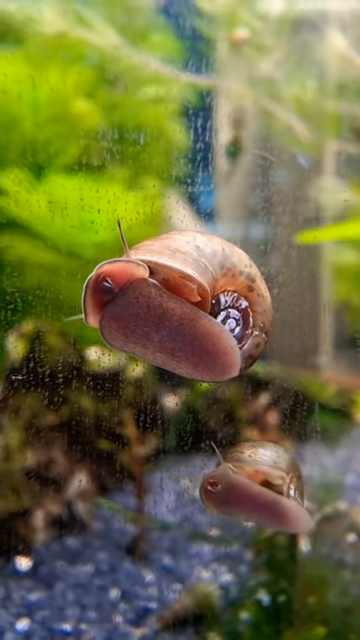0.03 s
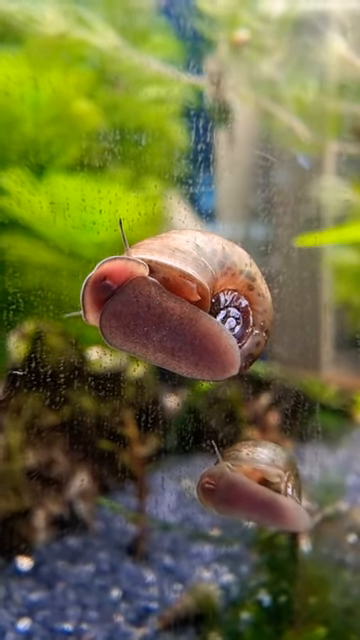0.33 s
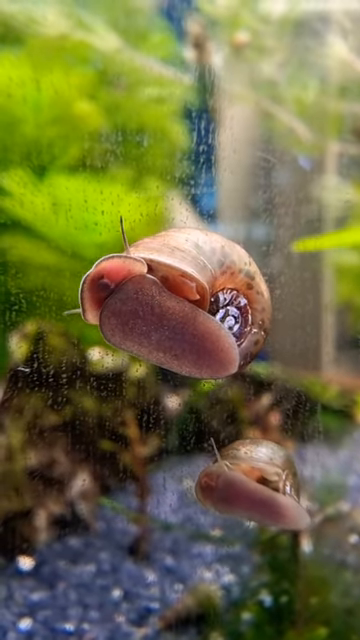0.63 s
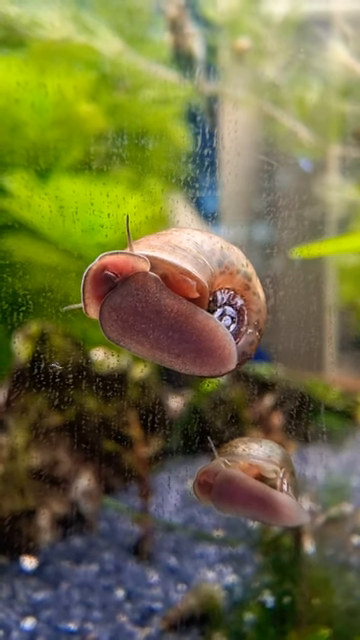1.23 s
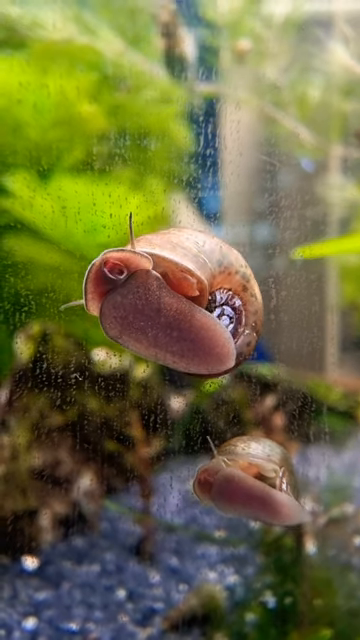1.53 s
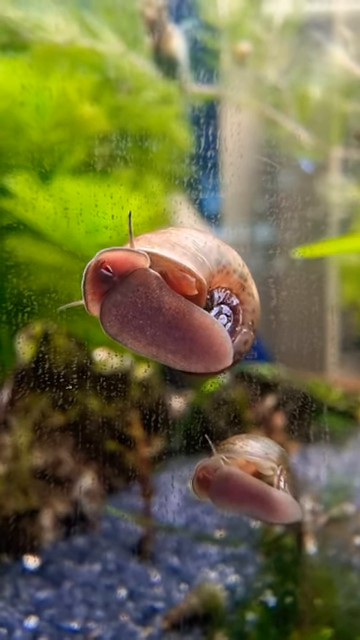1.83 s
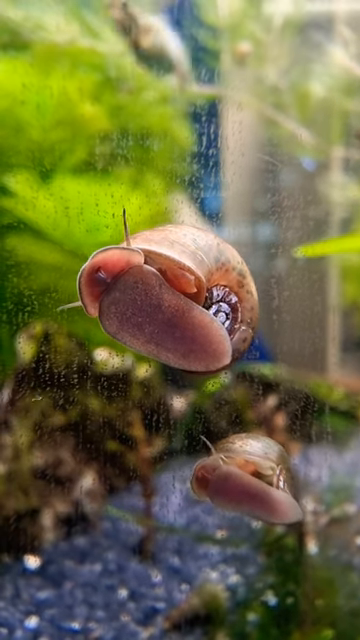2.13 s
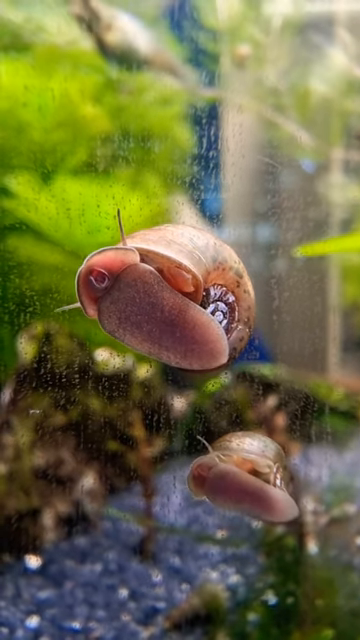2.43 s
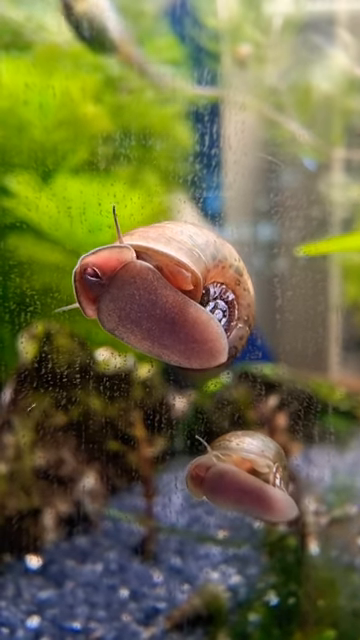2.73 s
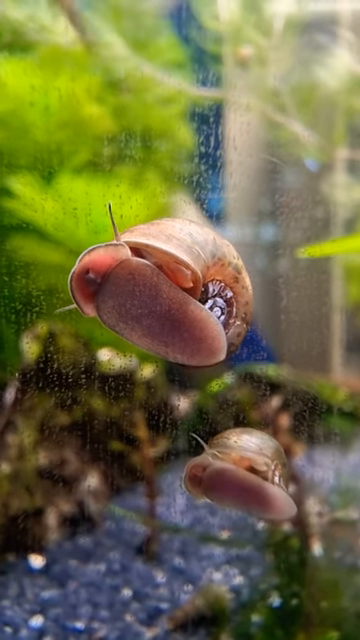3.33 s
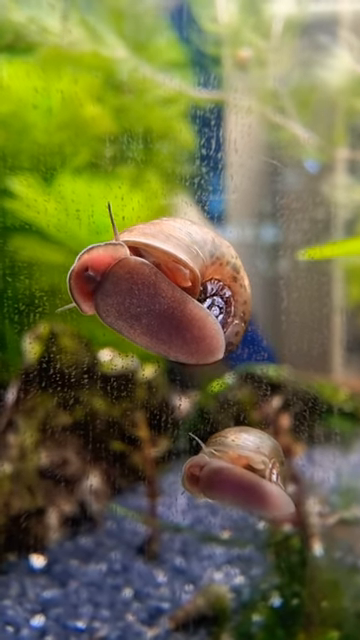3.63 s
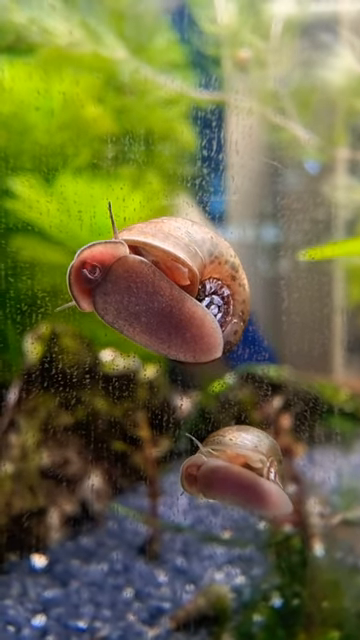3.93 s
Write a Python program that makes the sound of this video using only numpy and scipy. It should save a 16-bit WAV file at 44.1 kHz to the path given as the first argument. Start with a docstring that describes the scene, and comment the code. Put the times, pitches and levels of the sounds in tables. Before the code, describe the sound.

An aquarium pump hums low and steady, heard close to the glass in a quiet room, over a soft rush of water and air. Near the end come two faint dull bumps and a soft knock.

```python
"""A low, steady mains hum from an aquarium pump, heard close to the glass in a quiet room.
A motor adds slowly wandering tones of its own, over a soft rush of circulating water and air.
A few faint hisses pass in the first half. Near the end come two dull bumps, the first very faint,
and then a soft ringing knock."""
import sys
import numpy as np
from scipy import signal
from scipy.fft import rfft, irfft
from scipy.io import wavfile

SR = 44100
rng = np.random.default_rng(int(sys.argv[2]) if len(sys.argv) > 2 else 0)


def store_wav(level_fs):
    """Save 16-bit WAV to argv[1]."""
    pcm = np.round(np.clip(np.atleast_2d(level_fs), -1, 1) * 32767)
    wavfile.write(sys.argv[1], SR, pcm.T.astype(np.int16))


N = 176400

# pump hum: multiple of the mains, left level/dB, right level/dB
PUMP_HARMONICS = [(2, -46.5, -46.5), (4, -84.5, -71), (5, -67, -62), (6, -71, -62.5), (7, -85.5, -74.5),
                  (8, -88, -69.5), (10, -84.5, -80.5), (14, -83.5, -81.5), (18, -90.5, -86)]
# motor tones, off the mains series: f/Hz, left level/dB, right level/dB
MOTOR_TONES = [(42.3, -76, -75), (49.4, -65, -64), (70.9, -73, -72), (142.6, -66, -66), (190.3, -69, -67),
               (206.2, -77, -74), (412.5, -78, -74), (587.5, -82, -79), (618.8, -84, -76), (1380, -94, -89)]
# bed of water and air: f/Hz, left density/dB per Hz, right density/dB per Hz
RUSH_SPECTRUM = [(19.7, -99, -98.5), (31, -87, -85.5), (47, -78.5, -77.5), (81.7, -74.5, -76.5),
                 (115, -84, -78.5), (174, -89.5, -86.5), (264, -93.5, -80), (373, -90, -89),
                 (481, -93.5, -94), (683, -98, -90), (1033, -93.5, -91.5), (1430, -99, -99),
                 (1573, -105, -103), (2200, -109, -109), (3015, -113, -110), (3300, -119, -120),
                 (4650, -131, -129), (6400, -130, -123), (7360, -123, -120), (8340, -137, -137),
                 (10700, -137, -137), (12800, -135, -132), (15500, -135, -132)]
# resonances that colour the bed: f/Hz, width/Hz, lift/dB
RUSH_RESONANCES = [(301.5, 14, 8.5), (441.2, 12, 7.5), (587.7, 65, 10), (735, 16, 3.5), (1382, 40, 6.5),
                   (1792, 28, 6.5), (2884, 91, 2), (3920, 570, 2), (5260, 220, 1.5), (7300, 150, 4)]
# stereo image: f/Hz, likeness of the two sides (0-1), left lead/rad
STEREO_IMAGE = [(49, .94, 0.13), (145, 0.7, 0.083), (249, 0.5, 0.41), (343, 0.2, 0.24), (524, 0, 0.41),
                (617, 1, 1.98), (820, 0.62, 2.58), (1200, 0.82, 2.96), (1820, 0.54, 2.2), (2300, 0.02, 2.3),
                (8000, 0.2, 3.4)]
# faint hisses: centre t/s, half length/s, density/dB per Hz, lower edge/Hz, upper edge/Hz
HISS_SWELLS = [(.868, .038, -114, 6200, 7200), (1.665, .024, -128, 12500, 15500),
               (1.92, .045, -107, 2700, 3000), (1.948, .035, -119.5, 3500, 7000)]
# contacts behind the dull bumps: t/s, drive level/dB
BUMP_HITS = [(2.990, -46), (3.769, -35.5)]
# modes of the bumped body: f/Hz, gain/dB, t60/s, leftward pan/dB
BUMP_BODY = [(304, -2, .012, -12), (850, -9, 0.0065, 7.5), (1870, -17.5, 0.0071, -0.5)]
# ring of the knock: f/Hz, relative level/dB, blur width/Hz
KNOCK_RING = [(388, -7, 20), (620, -8, 60), (883, 0, 7), (1020, -10, 60), (1300, -8, 50)]


def from_db(db):
    """Decibels to gain."""
    return 10 ** (np.asarray(db) / 20)


def at_hz(rows, hz):
    """Each column of a table, read on a log-frequency axis."""
    knots, *columns = np.transpose(rows)
    return [np.interp(np.log(hz + 1e-9), np.log(knots), column) for column in columns]


def panned(db):
    """Left and right gains; positive dB leans left."""
    return from_db([[db / 2], [-db / 2]])


def drift(rate_hz):
    """Smooth random modulation with spread 1, rolled off above rate_hz."""
    hop, settle = 40, 2000
    pole = np.exp(-2 * np.pi * rate_hz * hop / SR)
    noise = rng.standard_normal(N // hop + settle + 2)
    slow = signal.lfilter([1], [1, -2 * pole, pole * pole], noise)[settle:]
    return np.interp(np.arange(N) / hop, np.arange(len(slow)), slow / slow.std())


def tone(hz, swing, lead=None):
    """A stereo sine of rms 1, then modulated in level and phase by swing; lead/rad puts the left ahead."""
    lead = at_hz(STEREO_IMAGE, hz)[1] if lead is None else lead
    wave = swing * np.exp(2j * np.pi * (hz * np.arange(N) / SR + rng.random()))
    return np.sqrt(2) * np.real([wave * np.exp(1j * lead), wave])


def stereo_noise(density_db):
    """Noise of a given spectrum, partly shared between left and right."""
    alike, lead = at_hz(STEREO_IMAGE, np.fft.rfftfreq(N, 1 / SR))
    right, own = rfft(rng.standard_normal((2, N)))
    left = alike * np.exp(1j * lead) * right + np.sqrt(1 - alike ** 2) * own
    return irfft(np.array([left, right]) * from_db(density_db), N) * np.sqrt(SR / 2)


def pump_hum(mains_hz=50.02, waver_db=0.82, waver_hz=2.5):
    """The pump hums in gently wavering harmonics of the mains, the second far above the rest."""
    out = 0
    for multiple, left_db, right_db in PUMP_HARMONICS:
        swing = from_db(waver_db * drift(waver_hz))
        out += from_db([[left_db], [right_db]]) * tone(multiple * mains_hz, swing)
    return out


def motor_drone(waver_depth=0.22, waver_hz=1.8):
    """The motor's weaker tones wander in strength and phase."""
    out = 0
    for hz, left_db, right_db in MOTOR_TONES:
        swing = 1 + waver_depth * (drift(waver_hz) + 1j * drift(waver_hz))
        out += from_db([[left_db], [right_db]]) * tone(hz, swing)
    return out


def water_rush():
    """Circulating water and air lay down an even bed of noise, lifted at a few resonances."""
    f = np.fft.rfftfreq(N, 1 / SR)
    lift_db = sum(db / (1 + (2 * (f - hz) / width) ** 2) for hz, width, db in RUSH_RESONANCES)
    return stereo_noise(np.array(at_hz(RUSH_SPECTRUM, f)) + lift_db)


def hisses(skirt_db_per_octave=31, top_db_per_octave=56.5):
    """Brief swells of high noise, barely above the rush, with a soft lower skirt and a steep top."""
    t = np.arange(N) / SR
    f = np.fft.rfftfreq(N, 1 / SR) + 1
    out = 0
    for centre_s, half_s, db, low_hz, high_hz in HISS_SWELLS:
        skirt_db = skirt_db_per_octave * np.maximum(np.log2(low_hz / f), 0)
        top_db = top_db_per_octave * np.maximum(np.log2(f / high_hz), 0)
        swell = np.exp(-.5 * ((t - centre_s) / half_s) ** 2)
        out += swell * stereo_noise(db - skirt_db - top_db)
    return out


def dull_bumps(contact_hz=1800):
    """Soft contacts push a heavily damped body, whose modes die almost at once."""
    clicks = np.full(N, 1e-18)
    for start_s, db in BUMP_HITS:
        clicks[int(start_s * SR)] = from_db(db)
    push = signal.sosfilt(signal.butter(2, contact_hz, fs=SR, output="sos"), clicks)
    out = 0
    for hz, db, t60, pan_db in BUMP_BODY:
        pole = from_db(-60 / (t60 * SR))
        angle = 2 * np.pi * hz / SR
        ring = signal.lfilter([0, np.sin(angle)], [1, -2 * pole * np.cos(angle), pole * pole], push)
        out += from_db(db) * panned(pan_db) * ring
    return out


def soft_knock(start_s=3.933, attack_s=.015, t60_s=.115, gain_db=-50.8, pan_db=-4):
    """A blurred knock swells quickly and rings out in a few unsteady modes, louder on the right."""
    roughness, left_lead_s = 0.23, .00034
    age = np.arange(N) / SR - start_s
    attack = np.clip(age / attack_s, 0, 1)
    decay = from_db(-60 * np.maximum(age - attack_s, 0) / t60_s)
    ring = 0
    for hz, db, width_hz in KNOCK_RING:
        swing = 1 + roughness * (drift(width_hz) + 1j * drift(width_hz))
        ring += from_db(db) * tone(hz, swing, lead=2 * np.pi * hz * left_lead_s)
    return from_db(gain_db) * panned(pan_db) * attack * decay * ring


def scene():
    """A bed of hum and rush, with the small events on top."""
    return pump_hum() + motor_drone() + water_rush() + hisses() + dull_bumps() + soft_knock()


def record(dry):
    """A steep low-pass takes the very top off the mix."""
    cutoff_hz = 15750
    return signal.sosfiltfilt(signal.ellip(10, .05, 60, cutoff_hz, fs=SR, output="sos"), dry)


dry = scene()
out = record(dry)
store_wav(out)
```